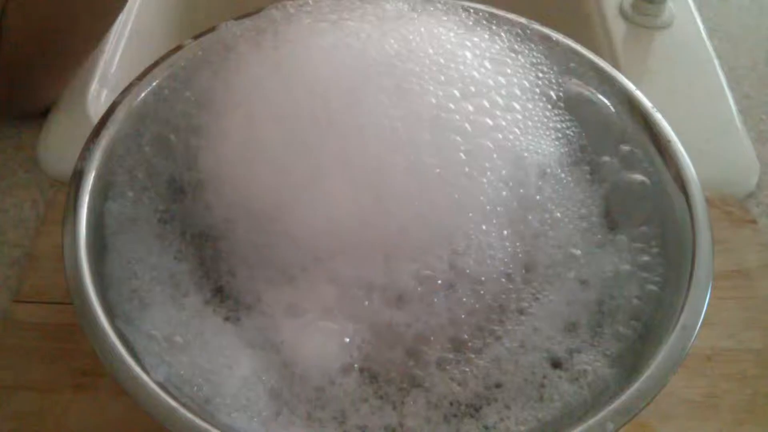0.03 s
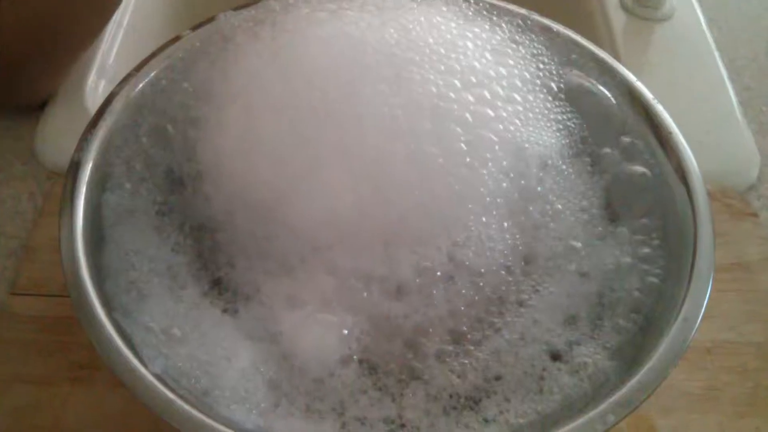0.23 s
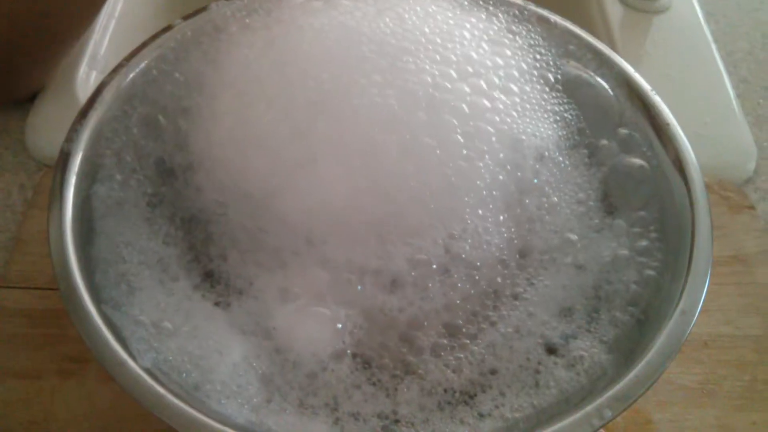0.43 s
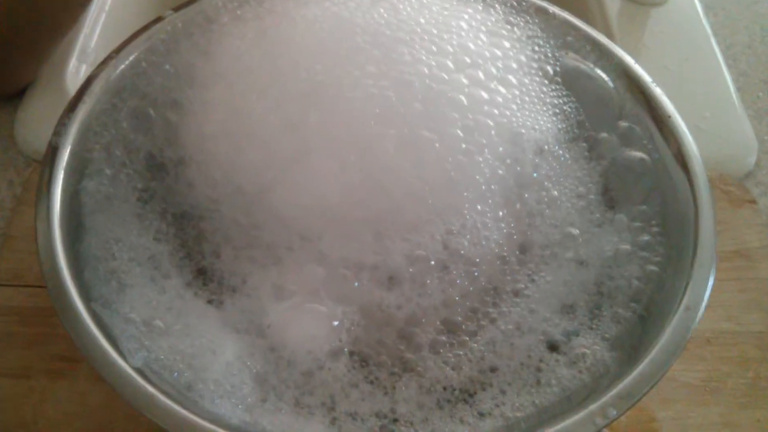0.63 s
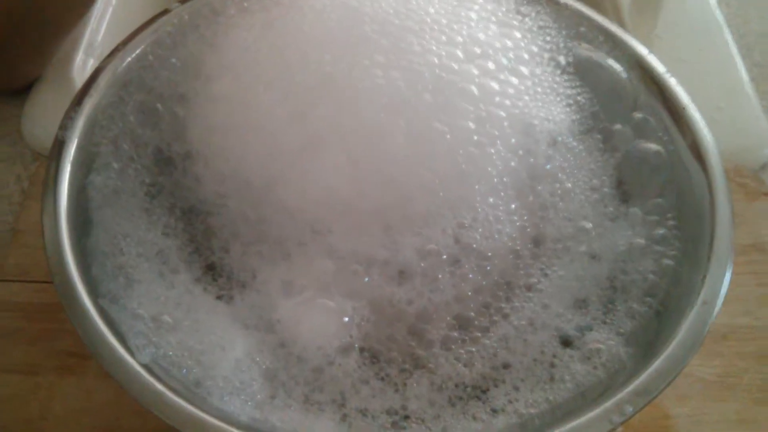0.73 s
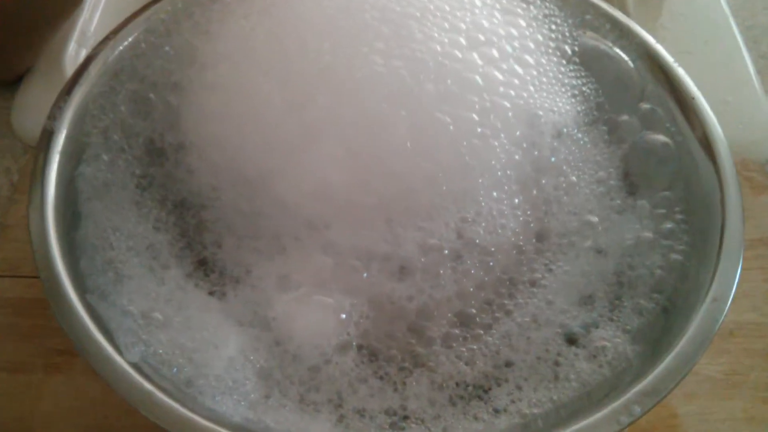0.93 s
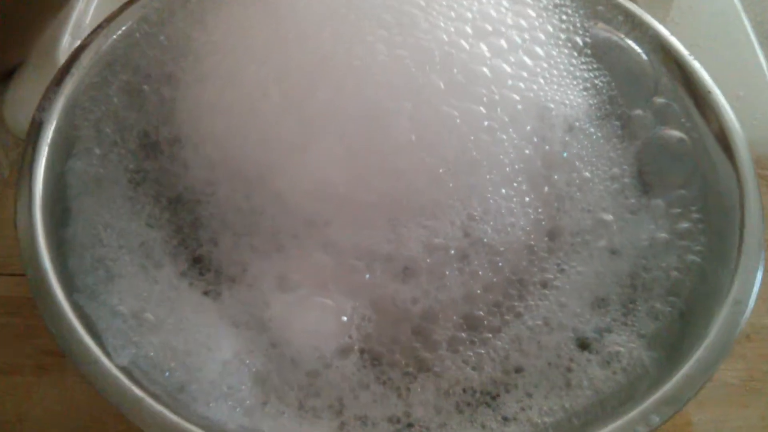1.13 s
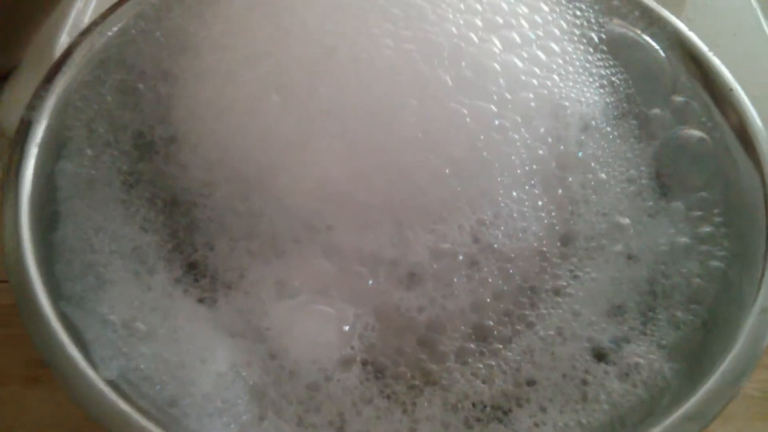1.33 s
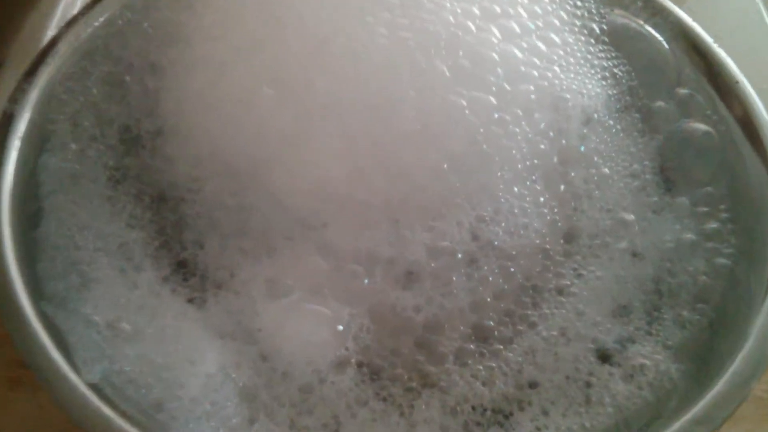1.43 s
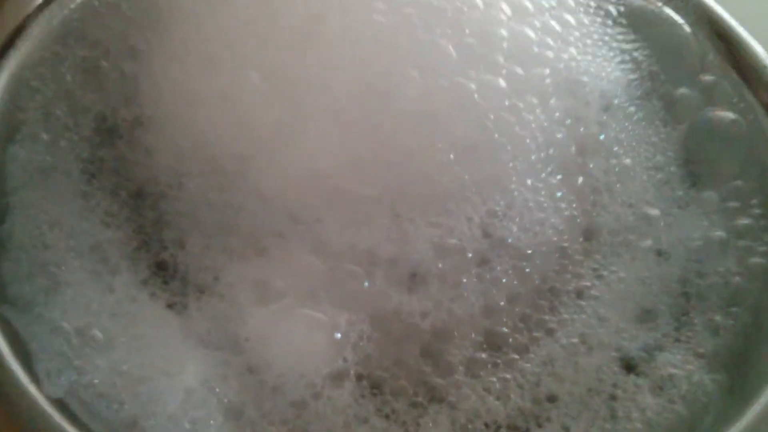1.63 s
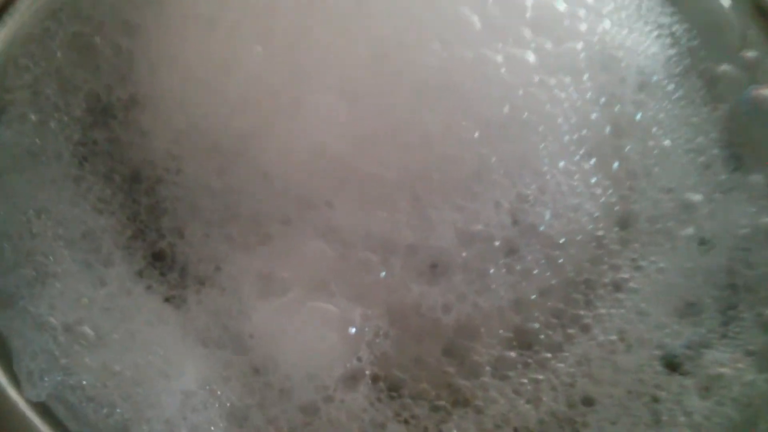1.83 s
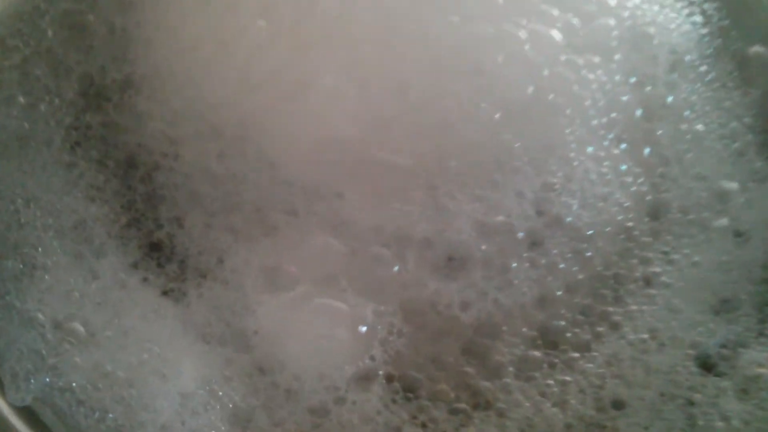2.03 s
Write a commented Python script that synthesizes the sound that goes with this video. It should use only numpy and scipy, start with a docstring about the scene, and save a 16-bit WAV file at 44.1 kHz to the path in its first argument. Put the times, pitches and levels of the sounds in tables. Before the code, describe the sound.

Close up in a kitchen, gas gurgles through foamy water in a metal bowl. Small bubbles plop and burst irregularly, a bigger one pops with a soft thump, then a few sharp ticks follow. Faint hum and hiss lie behind.

```python
"""A kitchen, one microphone close to a steel bowl where gas bubbles up through soapy water under foam.
Each bubble sings a short rising note as it surfaces, among ragged pops and thin pings. Foam films burst
in wet puffs and sharp ticks, and one big bubble thumps. Behind the bowl are a mains hum,
a low room rumble and a hiss."""
import sys
import numpy as np
from scipy import signal
from scipy.fft import rfft, irfft, next_fast_len
from scipy.io import wavfile
from scipy.ndimage import map_coordinates

SR = 44100
rng = np.random.default_rng(int(sys.argv[2]) if len(sys.argv) > 2 else 0)


def pcm_store(signal):
    """Save signal as 16-bit PCM."""
    levels = np.round(np.clip(np.atleast_2d(signal), -1, 1) * 32767)
    wavfile.write(sys.argv[1], SR, levels.astype(np.int16).T)


N = 92610  # 2.1 s


def amp(db):
    """Decibels to gain."""
    return 10 ** (np.asarray(db) / 20)


def curve(rows):
    """Join (seconds, value) points into one value per sample."""
    return np.interp(np.arange(N) / SR, *np.transpose(rows))


def wobble(knots_per_s, size):
    """A smooth random curve, size samples long."""
    return map_coordinates(rng.standard_normal(2048), [np.arange(size) * knots_per_s / SR], mode="wrap")


def filtered(x, response):
    """Filter x by a gain given as a function of frequency."""
    size = next_fast_len(N + SR // 2)
    return irfft(rfft(x, size) * response(np.fft.rfftfreq(size, 1 / SR)), size)[:N]


def noise(spectrum):
    """Noise of rms 1, shaped by (Hz, dB) points."""
    points_hz, db = np.transpose(spectrum)
    x = filtered(rng.standard_normal(N), lambda hz: amp(np.interp(np.log(hz + 1), np.log(points_hz), db)))
    return x / np.sqrt(np.mean(x ** 2) + 1e-20)


def add(out, start_s, sound):
    """Mix a sound into out at start_s."""
    i = int(np.clip(round(start_s * SR), 0, N))
    out[i:i + len(sound)] += sound[:N - i]


def decay(t, t60):
    """Exponential fall of 60 dB in t60 seconds."""
    return np.exp(-np.log(1000) * t / t60)


# The hum behind the bowl. Each row: time in seconds, level of the main tone in dB.
HUM_LEVEL = [(0, -101), (.03, -71), (.11, -62), (.21, -57.5), (.27, -49), (.5, -49.5), (1.89, -49.5),
             (2.1, -64.5)]
def mains_hum(hum_hz=119.2, mains_db=-19):
    """A tone at twice the mains frequency, over a weaker one at the mains frequency itself."""
    phase = 2 * np.pi * hum_hz * np.arange(N) / SR
    return amp(curve(HUM_LEVEL)) * np.sqrt(2) * (np.sin(phase) + amp(mains_db) * np.sin(phase / 2))


# The room's low end. Each row: time in seconds, level in dB.
RUMBLE_LEVEL = [(0, -90), (.3, -64.5), (.7, -65.5), (.92, -63.5), (1.5, -64.5), (2.1, -77)]
# Its colour. Each row: frequency in Hz, relative level in dB.
RUMBLE_SPECTRUM = [(20, -32), (40, -21), (57, -28), (80, -9.5), (160, -4.5), (320, -7.5), (800, -53)]
def room_rumble():
    """Low noise that fades in, holds and falls away."""
    return amp(curve(RUMBLE_LEVEL)) * noise(RUMBLE_SPECTRUM)


# The fade of hiss, simmer, small bubbles, crackle and close ticks. Each row: time in seconds, gain in dB.
FADE = [(0, -47), (.03, -13.5), (.11, -4.5), (.2, -1.5), (.3, 1.5), (1.87, 1.5), (2.1, -7.5)]
# The hiss behind the bowl. Each row: frequency in Hz, relative level in dB.
HISS_SPECTRUM = [(500, 11.5), (2400, -2.5), (3200, -2), (4100, 2), (6000, 4.5), (8000, 2), (12000, 1),
                 (15800, -2)]
def hiss(level_db=-61.5, sizzle_hz=8000):
    """A broad hiss whose finest sizzle holds on as the rest fades."""
    broad = noise(HISS_SPECTRUM)
    sizzle = filtered(broad, lambda hz: 1 - np.exp(-(hz / sizzle_hz) ** 2))
    gain = amp(level_db + curve(FADE))
    return gain * (broad - sizzle) + np.maximum.accumulate(gain) * sizzle


# The water under the foam. Each row: frequency in Hz, relative level in dB.
SIMMER_SPECTRUM = [(40, -58), (120, -13.5), (300, -12.5), (550, 0.5), (900, -0.5), (1300, -6.5), (1900, -9),
                   (2400, -17.5), (3000, -36), (6000, -71)]
def simmer(level_db=-54.5, swing_db=2.5):
    """A wavering wash of bubbling, muffled by the foam."""
    return amp(level_db + swing_db * wobble(34.95, N)) * noise(SIMMER_SPECTRUM)


def bubble_note(length_s, first_hz, last_hz, peak_at, attack_s=0.00046, start_share=0.63):
    """A gas pocket rings, rising in pitch as it nears the surface, and dies as it opens."""
    age = np.linspace(0, 1, max(int(length_s * SR), 8))
    hz = first_hz * (last_hz / first_hz) ** (age ** 1.087)  # the glide speeds up
    peak_at = np.clip(peak_at, .02, .95)
    attack = 1 - np.exp(-age * length_s / attack_s)
    swell = start_share + (1 - start_share) * np.minimum(age / peak_at, 1) ** 1.6
    release = np.abs(np.cos(np.pi / 2 * np.maximum(age - peak_at, 0) / (1 - peak_at))) ** 0.61
    return attack * swell * release * np.sin(2 * np.pi * np.cumsum(hz) / SR)


def small_bubbles(per_s=140, level_db=-51, centre_hz=839.6, typical_s=0.0207, rise_ratio=1.286):
    """A random crowd of faint bubbles, loudest at middle pitches; the lower ones tend to ring longer."""
    out = np.zeros(N)
    half_rise = np.sqrt(rise_ratio)
    for when, peak_at, *draws in rng.random((int(per_s * N / SR), 5)):
        pitch, life, strength = 2 * np.array(draws) - 1
        hz = centre_hz * np.exp(.8 * pitch)
        length_s = typical_s * np.exp(life / 2) * np.sqrt(centre_hz / hz)
        note = bubble_note(length_s, hz / half_rise, hz * half_rise, peak_at / 2)
        add(out, when * N / SR, note * amp(level_db + 3.8 * strength - 7 * pitch ** 2))
    return out


def film_snap(pitch_ratio=1, top_hz=9430, end_hz=4000, fall_s=0.00057, peak_s=0.00036):
    """A tiny film snaps: a fast falling chirp with a faint tail, transposed by pitch_ratio."""
    t = np.arange(SR // 40) / SR
    hz = pitch_ratio * (end_hz + (top_hz - end_hz) * np.exp(-t / fall_s))
    spike = (t / peak_s * np.exp(1 - t / peak_s)) ** 2
    tail = amp(-16.5) * (1 - np.exp(-t / peak_s)) * decay(t, t60=0.024)
    return (spike + tail) * np.sin(2 * np.pi * np.cumsum(hz) / SR)


def foam_crackle(per_s=74, faintest_db=-71, range_db=19):
    """Tiny films snap at random in the foam, most of them barely heard."""
    out = np.zeros(N)
    for when, strength, pitch in rng.random((int(per_s * N / SR), 3)):
        add(out, when * N / SR, amp(faintest_db + range_db * strength ** 2) * film_snap(.9 + .5 * pitch))
    return out


# Bubbles that stand out at close range. Each row: start in seconds, length in seconds,
# first and last pitch in Hz, peak level in dB, place of the peak in the note from 0 to 1.
SURFACING_BUBBLES = [ (.067, 0.022, 840, 1185, -46.5, 0.1), (.069, 0.053, 610, 1250, -45, 0.46),
                     (0.095, 0.049, 503, 1220, -47, 0.5), (0.188, 0.042, 536, 883, -43.5, 0.9),
                     (0.238, .046, 749, 1384, -40, 0.07), (0.236, 0.049, 600, 1107, -36, 0.45),
                     (0.306, 0.042, 542, 1190, -37, 0.7), (0.377, 0.028, 612, 958, -31.5, 0.6),
                     (0.392, 0.055, 579.5, 963, -33.5, 0.5), (0.457, 0.053, 540, 1054, -41, 0.5),
                     (0.508, 0.04, 553.4, 1146, -42, 0.86), (.592, 0.076, 560, 934, -35.5, 0.58),
                     (.6, 0.0398, 802, 1182, -40.5, .4), (.678, 0.021, 829, 1307, -20.5, 0),
                     (0.695, .016, 1222, 1480, -34.5, 0.36), (.7, .018, 967, 950, -32, 0.1),
                     (0.728, 0.032, 550, 1153, -37, 1), (.762, 0.03, 683, 996, -36.5, 0.05),
                     (0.829, 0.027, 733, 1100, -42.5, 0.3), (0.86, .048, 480, 1120, -40, .68),
                     (.951, 0.05, 582, 1052, -36, 0.12), (.952, 0.069, 472.4, 932, -37, .38),
                     (1.045, 0.042, 628, 1255, -42.5, 0.38), (1.052, 0.054, 642, 1020, -42.5, .3),
                     (1.143, 0.022, 564, 910, -39.5, 0.84), (1.165, 0.017, 954, 1446, -31.5, 0),
                     (1.168, 0.042, 862, 1540, -37.5, 0.2), (1.198, 0.044, 625, 1080, -39, 0.2),
                     (1.297, 0.041, 898, 1758, -44, 0.63), (1.34, .024, 1006, 1340, -40.5, 0.33),
                     (1.379, 0.052, 552, 1376, -38.5, 0.32), (1.452, 0.024, 651, 906, -33, 0.14),
                     (1.453, 0.02, 1465, 1646, -37.5, 0), (1.535, 0.04, 724, 980, -38, 0.4),
                     (1.531, .036, 782, 1460, -42, .45), (1.636, 0.027, 700, 1040, -37, .15),
                     (1.65, 0.035, 744, 974, -39.5, 0.76), (1.712, 0.063, 567, 937, -43, 0.43),
                     (1.786, 0.051, 664, 1753, -36, .23), (1.785, 0.039, 376, 584, -38.5, 0.53),
                     (1.813, 0.033, 518, 1126, -29.5, .46), (1.923, 0.035, 522, 600, -44, .43),
                     (1.939, 0.054, 983, 1505, -47.5, 0.05), (1.958, 0.049, 604, 980, -45, 0.3),
                     (2.006, 0.062, 586, 1172, -44, 0.43), (2.069, 0.039, 557, 853, -48.5, 0.3)]
def surfacing_bubbles(flutter_db=2, flutter_per_s=263):
    """Each bubble sings one gliding note as it comes up, its loudness trembling a little."""
    out = np.zeros(N)
    for start_s, length_s, first_hz, last_hz, db, peak_at in SURFACING_BUBBLES:
        note = bubble_note(length_s, first_hz, last_hz, peak_at)
        add(out, start_s, note * amp(db + flutter_db * wobble(flutter_per_s, len(note))))
    return out


# Pops and pings from the bowl. Each row: start in seconds, pitch in Hz, level in dB.
POPS_AND_PINGS = [ (.131, 4750, -50.5), (.154, 3940, -49.5), (.383, 1753, -34), (.447, 1900, -49),
                  (.535, 1085, -31), (.538, 2000, -42.5), (.6843, 4800, -48), (.7995, 1347, -28.5),
                  (.8005, 1715, -28), (.851, 2010, -36), (.9345, 1295, -33.5), (1.1622, 870, -15),
                  (1.16, 402, -32.5), (1.297, 920, -34.5), (1.34, 1020, -29), (1.3783, 5260, -51),
                  (1.536, 563, -35), (1.917, 4100, -49.5), (1.9425, 1066, -46), (2.0812, 4840, -53.5)]
def pops_and_pings(attack_s=0.0021, roughness_rad=0.43):
    """Short ragged pops, and the thin high pings of faint ticks."""
    out, t = np.zeros(N), np.arange(SR // 16) / SR
    envelope = (1 - np.exp(-t / attack_s)) * decay(t, t60=0.029)
    for start_s, hz, db in POPS_AND_PINGS:
        phase = 2 * np.pi * hz * t + roughness_rad * wobble(hz / 2, len(t))
        add(out, start_s, amp(db) * envelope * np.sin(phase))
    return out


# Films bursting in the mound of foam. Each row: start in seconds, splat level in dB, fizz level in dB.
FILM_BURSTS = [(0.447, -46, -70), (0.608, -43.5, -46), (.644, -41, -47), (0.933, -46.5, -69),
               (1.028, -43.5, -52), (1.047, -49, -62), (1.326, -54, -53.5), (1.378, -47.5, -60),
               (1.508, -48, -68), (1.639, -41, -52.5), (1.666, -39, -52.5), (1.785, -42.5, -57),
               (1.801, -43, -47)]
# The colours of the wet splat and the fizzing spray. Each row: frequency in Hz, relative level in dB.
SPLAT_SPECTRUM = [(50, -55), (160, -3), (500, -7.5), (1200, -2), (2000, -4), (2500, -15.5), (3100, -23.5),
                  (6000, -65)]
FIZZ_SPECTRUM = [(2000, -13), (3200, -11.5), (4200, 3.5), (5000, 2.5), (6000, -1), (8000, -4.5),
                 (11000, -12), (16000, -27)]
# The steel bowl's resonances. Each row: frequency in Hz, relative level in dB.
BOWL_MODES = [(1715, 3.5), (1978, 4), (2052, -4), (3810, -3.5), (4340, -0.5), (4930, -1)]
def film_bursts(attack_s=0.00043, bowl_db=-11.5):
    """A film tears: a wet splat, a puff of fine spray and a faint ring of the bowl."""
    splat_gain, fizz_gain, ring = np.zeros((3, N))
    t = np.arange(SR // 6) / SR
    attack = 1 - np.exp(-t / attack_s)
    for start_s, splat_db, fizz_db in FILM_BURSTS:
        add(splat_gain, start_s, amp(splat_db) * attack * decay(t, t60=0.052))
        add(fizz_gain, start_s, amp(fizz_db) * attack * decay(t, t60=0.09))
        modes = sum(amp(db + rng.normal(0, 1.6)) * np.sin(2 * np.pi * (hz * t + rng.random()))
                    for hz, db in BOWL_MODES)
        ring_db = bowl_db + (splat_db + fizz_db) / 2
        add(ring, start_s, amp(ring_db) * attack * decay(t, t60=0.11) * modes)
    return splat_gain * noise(SPLAT_SPECTRUM) + fizz_gain * noise(FIZZ_SPECTRUM) + ring


def thump(start_s=1.163, hz=60.6, puff_db=-33, tear_db=-58):
    """One big bubble tears with a click and pushes out its gas in a low puff."""
    out, t = np.zeros(N), np.arange(SR // 8) / SR
    puff = amp(puff_db) * decay(t, t60=0.04) * np.cos(2 * np.pi * hz * t)
    tear = amp(tear_db) * decay(t, t60=0.0027) * rng.standard_normal(len(t))
    add(out, start_s, puff + tear)
    return out


# Ticks close to the microphone. Each row: start in seconds, level in dB before the fade.
CLOSE_TICKS = [(1.5732, -34), (1.587, -41), (1.824, -30), (1.8426, -38.5)]
def close_ticks():
    """A few tiny films snap sharply, well above the crackle."""
    out = np.zeros(N)
    for start_s, db in CLOSE_TICKS:
        add(out, start_s, amp(db) * film_snap())
    return out


def kitchen_echo(x, tail_db=-17, bowl_echo_delay_s=.009, bowl_echo_db=-15.5):
    """The kitchen's short reverberation, and an echo off the bowl that beats against each rising note."""
    t = np.arange(SR // 3) / SR
    tail = rng.standard_normal(len(t)) * decay(t, t60=.15) * (1 - np.exp(-t / 0.014))
    out = amp(tail_db) * signal.fftconvolve(x, tail / np.linalg.norm(tail))[:N]
    add(out, bowl_echo_delay_s, amp(bowl_echo_db) * x)
    return out


def scene():
    """The bowl in mono over the background; the main bubbling echoes, the fine sounds stay dry."""
    background = mains_hum() + room_rumble() + hiss()
    bubbling = surfacing_bubbles() + pops_and_pings() + film_bursts() + thump()
    fine_sounds = amp(curve(FADE)) * (simmer() + small_bubbles() + foam_crackle() + close_ticks())
    return (background + bubbling + kitchen_echo(bubbling) + fine_sounds)[None]


def record(dry):
    """The microphone has a hollow between gurgle and fizz, and keeps nothing above its band limit."""
    hollow_hz, width_hz, depth_db, limit_hz = 3150, 430, -2.5, 15850
    hollow = lambda hz: amp(depth_db * np.exp(-((hz - hollow_hz) / width_hz) ** 2))
    return filtered(dry[0], lambda hz: hollow(hz) * (hz < limit_hz))[None]


dry = scene()
out = record(dry)
pcm_store(out)
```